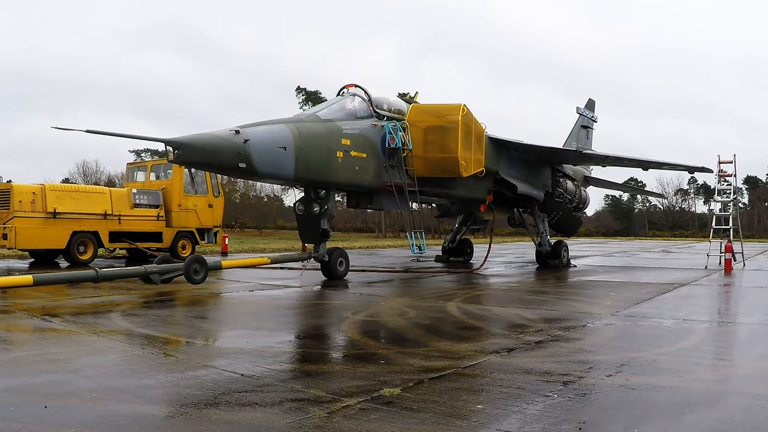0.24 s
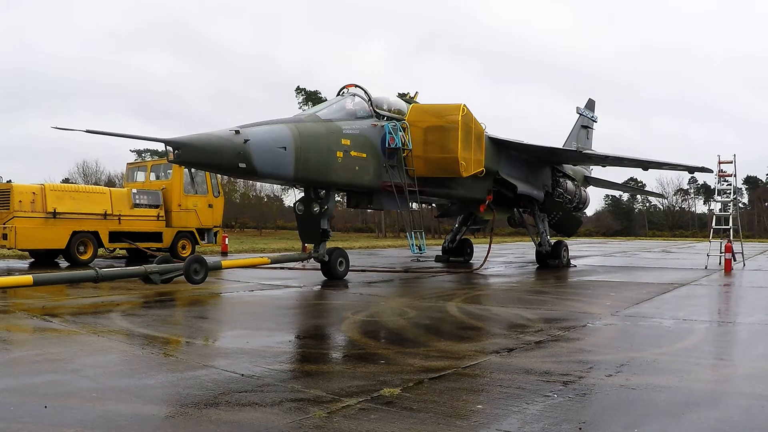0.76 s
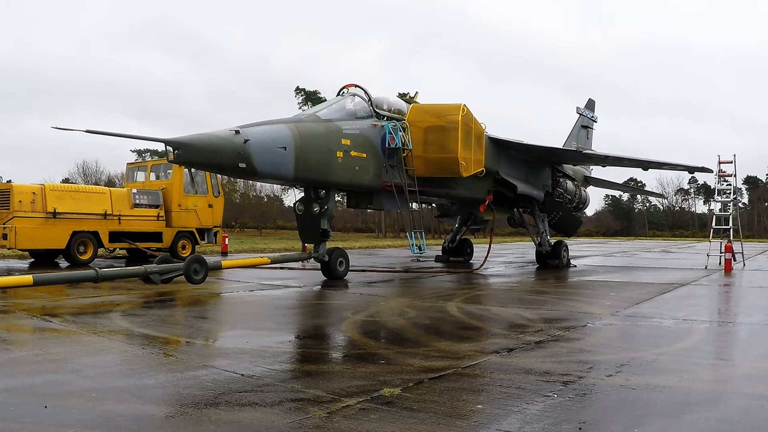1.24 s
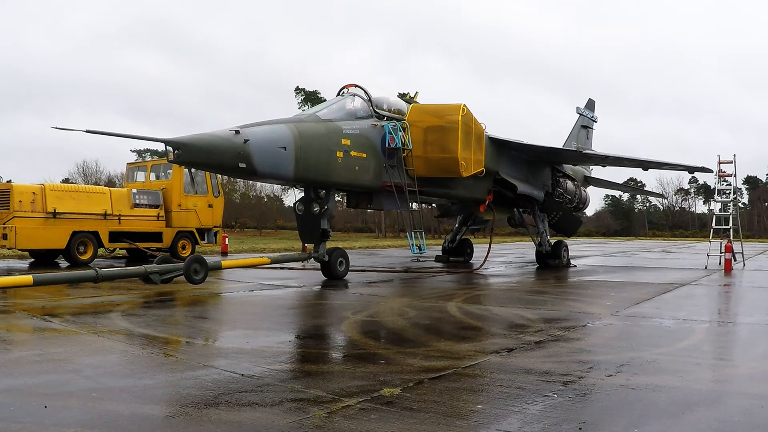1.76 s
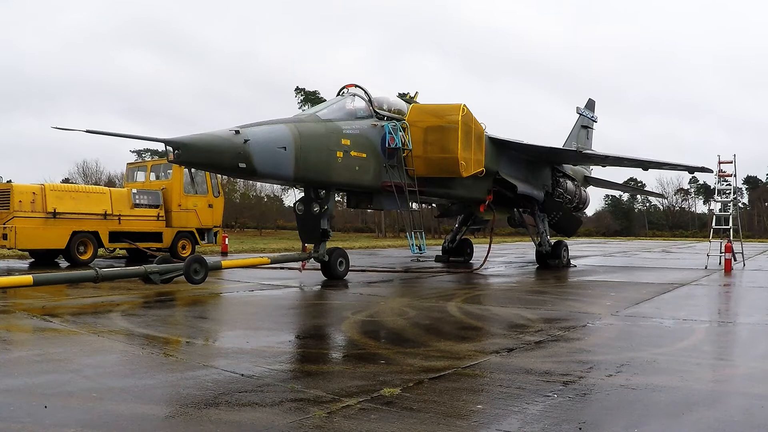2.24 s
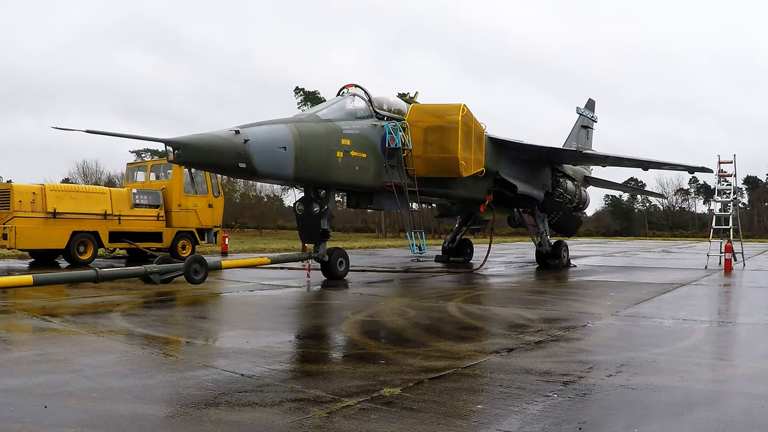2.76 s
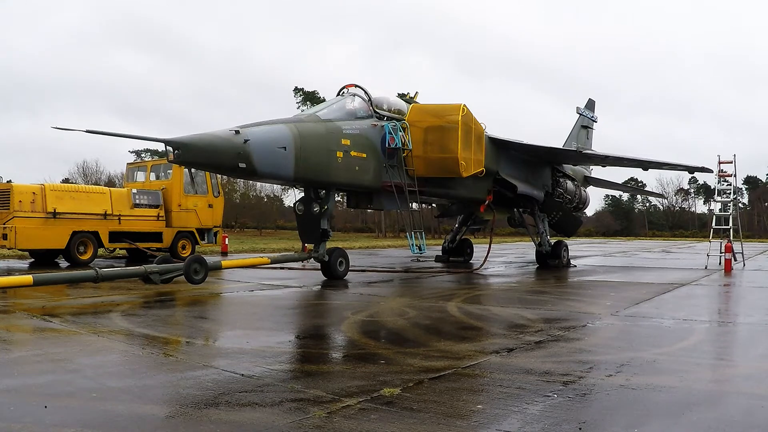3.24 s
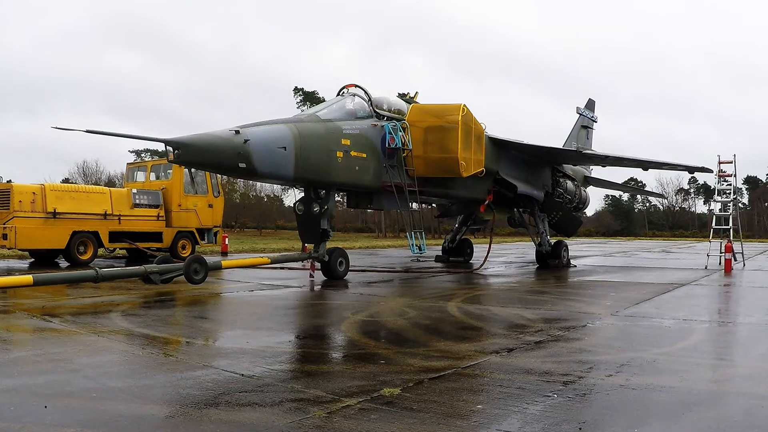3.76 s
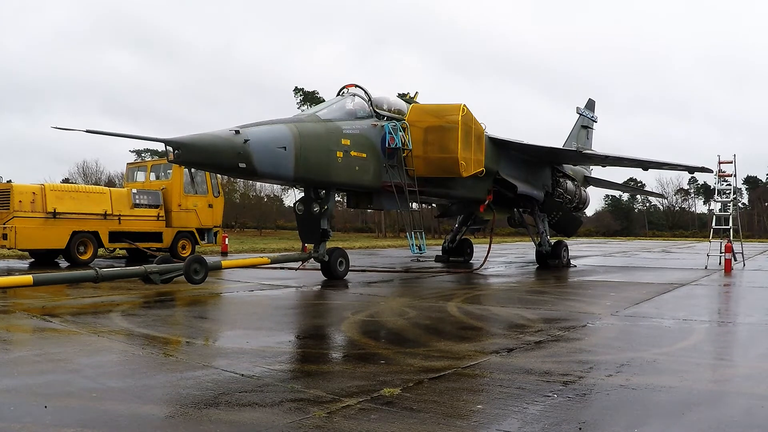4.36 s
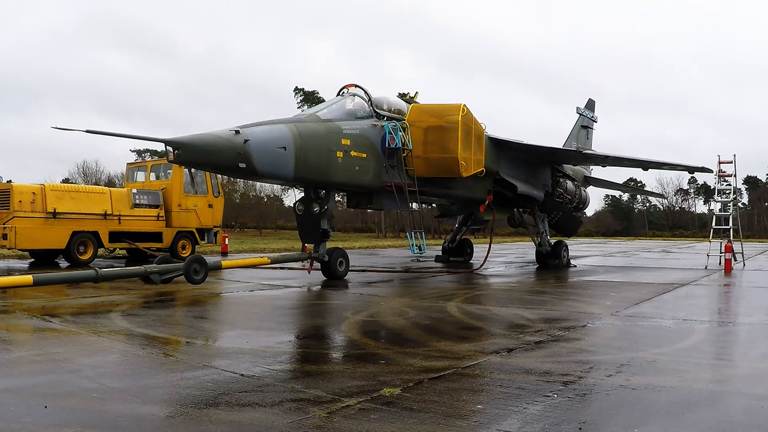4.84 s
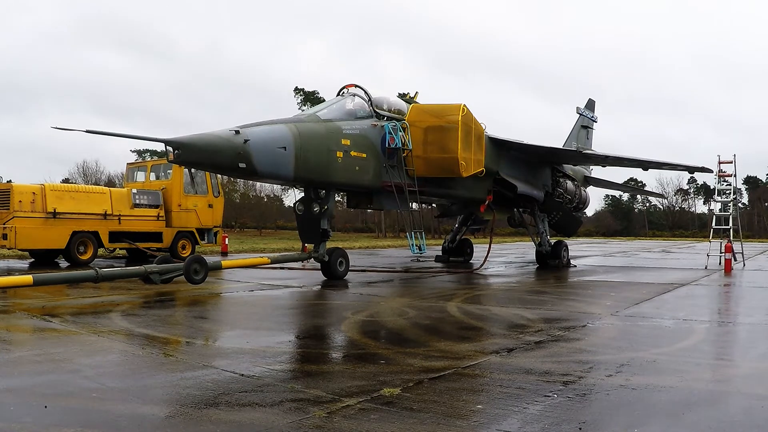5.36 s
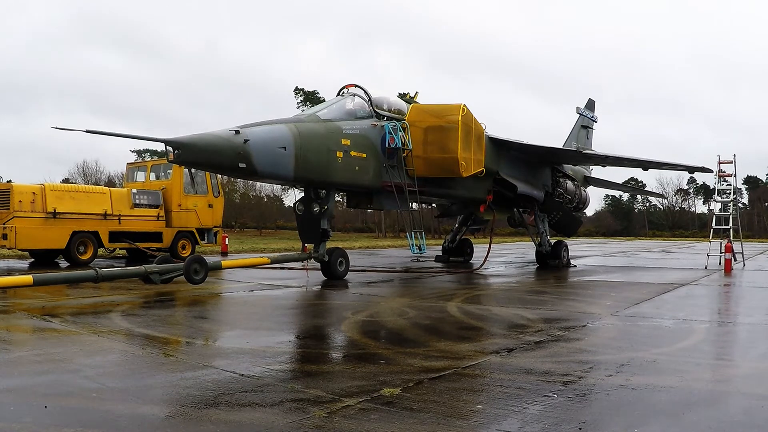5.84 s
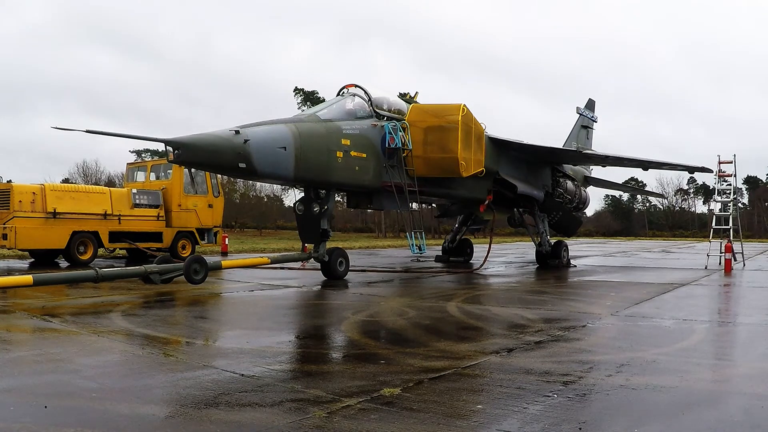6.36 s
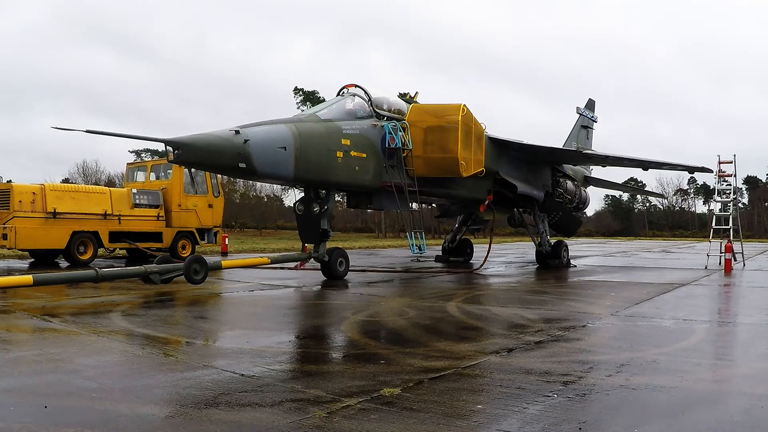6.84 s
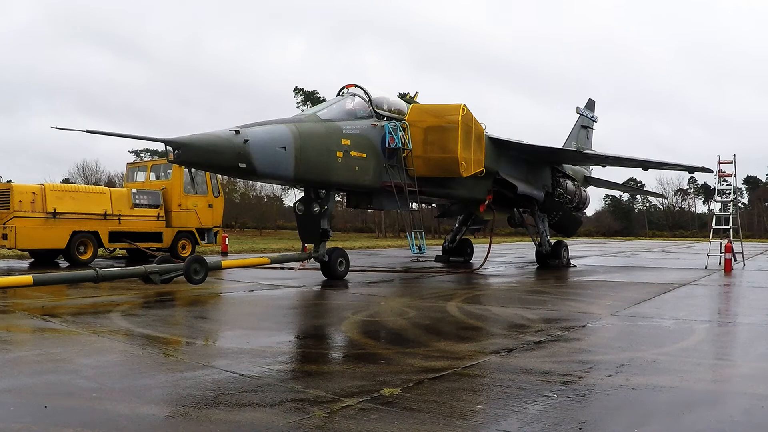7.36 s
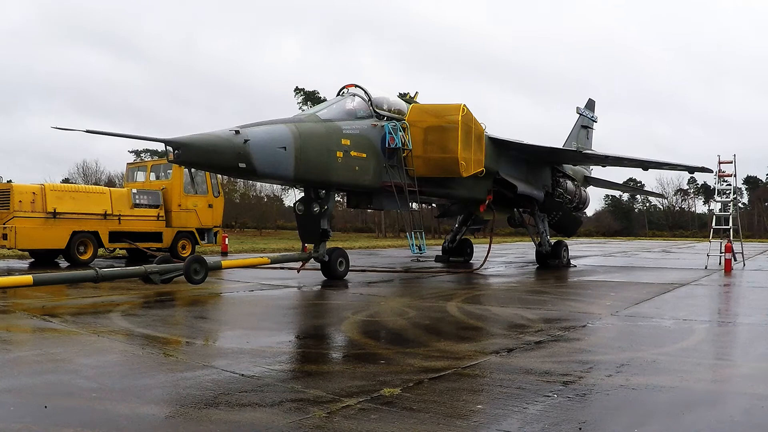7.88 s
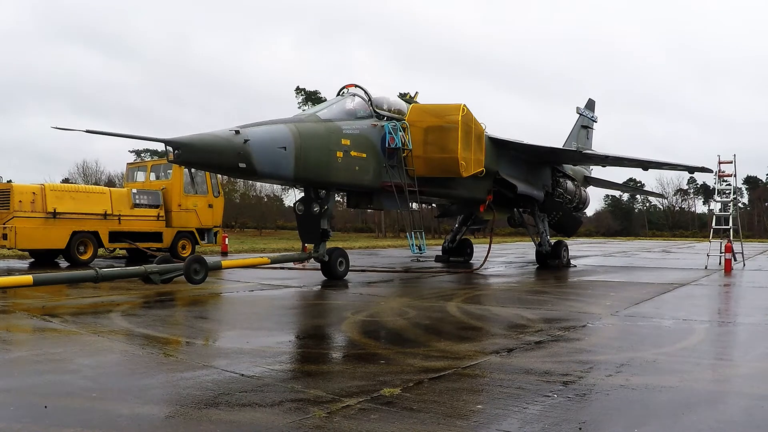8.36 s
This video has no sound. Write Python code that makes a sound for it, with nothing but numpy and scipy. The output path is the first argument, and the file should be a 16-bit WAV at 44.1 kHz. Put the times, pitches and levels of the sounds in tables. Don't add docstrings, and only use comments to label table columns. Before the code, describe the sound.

An open wet apron, heard at a distance through a camera microphone. From 0 s a small jet turbine is already spinning: a thin, fluttering whistle near 4.5 kHz glides upward within broad air hiss, while a diesel power cart idles with a steady low hum and faint gear whine. The whistle stands out most around 1.5-2 s, then sinks into the hiss, with blurred higher whistles and tiny airy puffs above. After 3 s wind rises; deep booming gusts near 50 Hz hit hardest around 4 s, again near 5.4 and 6.7 s, with irregular lulls between. From 4 to 5.5 s the pitch almost levels near 6 kHz. About 6.5 s combustion catches, a rough roar with an unsteady mid-pitched note; the whine climbs faster. The roar surges at 7.4 s and is loudest near 8.4 s, the whistle reaching almost 9 kHz, still rising at the end, 8.6 s.

```python
import sys
import numpy as np
from scipy import signal
from scipy.fft import rfft, irfft
from scipy.io import wavfile
from scipy.ndimage import uniform_filter1d

SR = 44100
rng = np.random.default_rng(int(sys.argv[2]) if len(sys.argv) > 2 else 0)


def magnitude_from_level(level_db):
    exponent = np.asarray(level_db, float) / 20
    return 10 ** exponent


def materialize(psi):
    bounded = np.clip(np.atleast_2d(psi).T, -1, 1)
    quanta = np.round(bounded * 32767).astype(np.int16)
    wavfile.write(sys.argv[1], SR, quanta)


N = 379701
TIME = np.arange(N) / SR

# t/s, f/Hz
SPOOL = [(0.0, 4483), (0.89, 4836), (1.78, 5199), (2.67, 5538), (3.26, 5748), (3.7, 5878), (4.15, 5977),
         (4.6, 6027), (5.04, 6040), (5.5, 6088), (5.93, 6174), (6.3, 6315), (6.67, 6578), (7.12, 7032),
         (7.56, 7600), (8.01, 8215), (8.3, 8542), (8.6, 8821)]


def curves(table):
    s, *columns = np.transpose(table)
    return [np.interp(TIME, s, column) for column in columns]


def lifts(events):
    s, lift_db, length = np.transpose(events)
    grid = TIME[::SR // 1000]
    bells = np.exp(-((grid[:, None] - s) / length) ** 2 / 2)
    return np.interp(TIME, grid, bells @ lift_db)


def walk(rate_hz):
    k = int(SR / np.clip(rate_hz, .2, 4000))
    steps = np.repeat(rng.standard_normal(N // k + 1), k)[:N]
    wander = uniform_filter1d(uniform_filter1d(steps, k), k)
    return wander / wander.std()


def tone(hz, wander_hz, steady):
    steady = np.clip(steady, 0, 1)
    scatter = (walk(wander_hz) + 1j * walk(wander_hz)) * np.sqrt((1 - steady) / 2)
    carrier = np.exp(2j * np.pi * np.cumsum(hz + 0 * TIME) / SR)
    return np.sqrt(2) * np.real((np.sqrt(steady) + scatter) * carrier)


def air(spectrum, flicker_db, flicker_hz):
    # f/Hz, width/Hz, level/dB
    path = [(313, 13, -4), (1154, 53, 2.5), (1383, 46, -7), (1636, 66, 1), (2282, 98, 8.5), (2583, 13, -14),
            (2904, 31, -7.5), (3170, 170, 2.5), (3460, 25, -14.5), (3848, 42, -17), (4730, 130, -5),
            (5770, 140, -3), (6750, 200, -1.5), (7970, 100, 2.5)]
    hz = np.fft.rfftfreq(N, 1 / SR) + 1
    points = np.array(spectrum)
    db = np.interp(np.log(hz), np.log(points[:, 0]), points[:, 1], left=-40, right=-40)
    for f, width, gain_db in path:
        db = db + gain_db * np.exp(-((hz - f) / width) ** 2 / 2)
    coloured = rfft(rng.standard_normal(N)) * magnitude_from_level(db)
    out = 0
    for octave in range(4, 15, 2):
        share = np.cos(np.pi / 4 * np.clip(np.log2(hz) - octave, -2, 2))
        out = out + irfft(coloured * share ** 2, N) * magnitude_from_level(flicker_db * walk(flicker_hz))
    return out / out.std()


def blade_pass():
    return uniform_filter1d(curves(SPOOL)[0], SR // 4, mode="nearest")


def intake_line(hz, multiple, table):
    return magnitude_from_level(np.interp(multiple * hz, *np.transpose(table)))


def first_row(hz):
    # t/s, level/dB
    whistle = [(0.0, -36.5), (1.0, -29.5), (1.75, -20.5), (2.3, -35), (3.0, -39), (3.8, -45.5),
               (4.5, -30.5), (5.4, -41.5), (6.3, -28.5), (7.2, -33.5), (7.85, -25.5), (8.1, -36),
               (8.61, -40)]
    # t/s, lift/dB, length/s
    fades = [(0.21, 9, 0.012), (0.41, 1.5, 0.017), (0.64, -7, 0.025), (0.83, -4.5, 0.021),
             (1.04, -2.5, 0.047), (1.23, -6.5, 0.023), (1.36, -11, 0.019), (1.46, -9, 0.043),
             (1.52, -9, 0.018), (1.63, -14, 0.027), (1.73, -10, 0.022), (1.86, -5, 0.028),
             (2.0, -12, 0.027), (2.18, -6.6, 0.04), (3.19, -10, 0.04), (4.25, -15, 0.022),
             (4.42, -10.8, 0.038), (4.5, -8, 0.022), (4.64, -13, 0.024), (4.81, -4.5, 0.025),
             (5.06, 6.5, 0.028), (5.34, 7.5, 0.025), (6.18, -6, 0.052), (6.45, -7, 0.02),
             (6.59, -7.5, 0.05), (6.94, -4, 0.017), (7.48, 4, 0.029), (7.65, -6.5, 0.022),
             (7.76, -9, 0.016), (7.97, -7, 0.055)]
    # f/Hz, level/dB
    overtone_exit = [(9000, -64), (10100, -54), (10600, -63), (11300, -53.5), (12000, -43.5),
                     (12900, -48.5), (13500, -46), (15600, -48)]
    level = magnitude_from_level(curves(whistle)[0] + lifts(fades))
    line = level * (tone(hz, 115, .68) + magnitude_from_level(-14) * tone(hz, 250, 0))
    return line + intake_line(hz, 2, overtone_exit) * tone(2 * hz, 70, 0.12)


def wake_puffs():
    # t/s, lift/dB, length/s
    puff_events = [(1.78, 4, .035), (2.85, 3, .025), (3.03, 2, .02), (3.26, 4, .045), (3.85, 1.5, .03),
                   (4.3, 2, .03), (4.56, 3, .025), (4.77, 3, .02), (5.0, 1.5, .02), (5.2, 3, .025),
                   (5.33, 2, .02), (5.6, 4, .02), (6.1, 2, .02), (6.55, 2, .03)]
    return magnitude_from_level(lifts(puff_events) + 2.0 * walk(40))


def later_rows(hz, puffs):
    # f/Hz, level/dB
    second_exit = [(11200, -54), (11800, -43.5), (12700, -47.5), (13500, -50), (14100, -50.5),
                   (14700, -52.5), (15100, -53), (15400, -49)]
    third_exit = [(12800, -68), (13800, -50), (14500, -56), (15200, -57), (15500, -66)]
    second_row, third_row = 2.501, 2.858
    second_hz, third_hz = second_row * hz, third_row * hz
    wake = magnitude_from_level(1.0) * tone(second_hz, 900, 0) + magnitude_from_level(-13.5) * puffs * tone(second_hz, 3000, 0)
    second = intake_line(hz, second_row, second_exit) * (tone(second_hz, 160, 0) + wake)
    third_hump = tone(third_hz, 220, 0) + magnitude_from_level(1.0) * tone(third_hz, 800, 0)
    third = intake_line(hz, third_row, third_exit) * third_hump
    return np.sqrt(puffs) * (second + third)


def intake_hiss(puffs):
    # f/Hz, level/dB per Hz
    hiss_spectrum = [(25, 15), (70, -10), (130, 4.5), (250, -5.5), (450, -4.5), (800, -11), (1300, -12.5),
                     (1700, -4), (3000, -2), (4200, 1), (5000, -5), (7500, -7.5), (8500, -17),
                     (10500, -19.5)]
    top_spectrum = [(8000, 3), (10500, -10), (12000, 5), (13500, -3), (15200, -4.5)]
    octaves = np.log2(curves(SPOOL)[0] / 6000)
    hiss = magnitude_from_level(-35.5 + 4.5 * octaves) * air(hiss_spectrum, flicker_db=1.0, flicker_hz=7.7)
    top = magnitude_from_level(-50 + 3.5 * octaves) * puffs ** 0.5 * air(top_spectrum, flicker_db=0.64, flicker_hz=24)
    return hiss + top


def cart():
    # multiple of the cycle, level/dB
    diesel = [(5, -53), (6, -52), (7, -56), (8, -48), (9, -54), (10, -60), (11, -62), (12, -50), (14, -61),
              (15, -64), (16, -61), (19, -63), (20, -59), (21, -62), (22, -56), (23, -64), (24, -64),
              (25, -64), (28, -65), (32, -63), (33, -65), (38, -68), (41, -69), (54, -69), (106, -58),
              (108, -57), (110, -56), (112, -53)]
    # f/Hz, level/dB, wander/Hz
    gears = [(724.8, -59, 4), (1367, -69, 4), (1449.6, -58, 4), (3015, -59, 6), (3060.6, -59, 6),
             (3755, -61, 8), (7538, -52, 25)]
    cycle_hz = 20.455
    angle = np.linspace(0, 2 * np.pi, 4097)
    cycle = 0
    for k, db in diesel:
        cycle = cycle + magnitude_from_level(db) * np.sqrt(2) * np.cos(k * angle + 2 * np.pi * rng.random())
    shaft = 2 * np.pi * np.cumsum(cycle_hz * (1 + .0008 * walk(3))) / SR
    whine = sum(magnitude_from_level(db) * tone(hz, wander_hz, .95) for hz, db, wander_hz in gears)
    return np.interp(shaft % (2 * np.pi), angle, cycle) + whine


def wind():
    # t/s, level/dB
    boom_level = [(0.0, -41.5), (1.2, -36), (2.5, -46), (2.9, -29.5), (3.5, -25.5), (4.1, -11.5),
                  (4.8, -30), (5.4, -13.5), (6.0, -24), (6.7, -15.5), (7.5, -29), (8.61, -24)]
    # t/s, lift/dB, length/s
    gusts = [(0.1, -14.6, 0.025), (0.42, -9.1, 0.033), (1.44, -4, 0.075), (1.74, -7, 0.053),
             (2.66, -11.4, 0.023), (2.99, -7.3, 0.025), (3.34, -9, 0.066), (3.55, -8, 0.019),
             (3.72, 5, 0.036), (3.98, -11.5, 0.024), (4.37, -4, 0.14), (4.57, -6.0, 0.016),
             (4.89, 8, 0.059), (5.06, -7.5, 0.035), (5.75, -13, 0.052), (5.99, 6.5, 0.017),
             (6.14, -8, 0.028), (6.37, -10, 0.02), (6.45, -5.5, 0.02), (6.53, -10, 0.022),
             (6.76, -19, 0.021), (6.87, -8, 0.076), (6.96, -9, 0.044), (7.12, 2, 0.04), (7.25, -14, 0.028),
             (7.62, -16, 0.033), (7.82, 9.5, 0.022), (8.03, -12, 0.025), (8.21, -15, 0.023),
             (8.34, 4.5, 0.021)]
    # t/s, level/dB
    buffet_level = [
        (0, -51),
        (2.4, -53.5),
        (3.1, -40),
        (3.7, -35.5),
        (4.1, -30),
        (4.7, -34.5),
        (5.8, -37),
        (7, -33.5),
        (8.61, -37),
    ]
    wind_db, gust_db = curves(boom_level)[0], lifts(gusts)
    cavity_hz = 53.6 + .1 * (wind_db + 25) + 1.3 * walk(4)
    boom = tone(cavity_hz + 1.2 * walk(14), 36, .94)
    buffet = tone(78, 30, 0) + magnitude_from_level(-12) * tone(105, 60, 0)
    thud = magnitude_from_level(-17) * tone(36, 30, 0)
    buffet_gain = magnitude_from_level(curves(buffet_level)[0] + 0.22 * gust_db)
    constant_rumble = magnitude_from_level(-46) * tone(37, 40, 0)
    return magnitude_from_level(wind_db + gust_db) * (boom + thud) + buffet_gain * buffet + constant_rumble


def combustion_roar():
    # t/s, level/dB
    light_up = [
        (5, -67),
        (6.2, -57),
        (6.6, -41.5),
        (7.31, -40),
        (7.37, -34),
        (7.8, -36),
        (8.3, -33.5),
        (8.45, -33),
        (8.61, -35.5),
    ]
    # f/Hz, level/dB per Hz
    roar_spectrum = [(100, -3.5), (300, -3), (450, -1.5), (900, -10.5), (1700, -5.5), (2300, -4), (3200, 0),
                     (4300, -4.5), (5000, -11), (8000, -11.5), (10500, -25), (12000, -24), (14000, -20)]
    # t/s, lift/dB, length/s
    flares = [
        (6.56, 8.1, 0.024),
        (6.69, 5, 0.022),
        (7.0, 4.4, 0.028),
        (7.61, 3, 0.027),
        (7.82, -7.6, 0.021),
        (7.96, -15, 0.025),
        (8.04, 10.5, 0.03),
        (8.11, -4.4, 0.03),
        (8.4, 4, 0.041),
    ]
    level = magnitude_from_level(curves(light_up)[0] + .8 * walk(14))
    noise = air(roar_spectrum, flicker_db=1.6, flicker_hz=16)
    duct_note = magnitude_from_level(-12.5 + lifts(flares)) * tone(1705, wander_hz=110, steady=.5)
    return level * (noise + duct_note)


def scene():
    hz, puffs = blade_pass(), wake_puffs()
    turbine = first_row(hz) + later_rows(hz, puffs) + intake_hiss(puffs)
    return (turbine + cart() + wind() + combustion_roar())[None]


def band_limit(x):
    return signal.sosfilt(signal.butter(12, 15660, fs=SR, output="sos"), x)


def record(dry):
    low_cut = signal.butter(2, 22, "high", fs=SR, output="sos")
    top_cut = signal.ellip(12, .3, 80, 15230, fs=SR, output="sos")
    mix = signal.sosfilt(top_cut, signal.sosfilt(low_cut, dry))
    return band_limit(mix)


dry = scene()
out = record(dry)
materialize(out)
```